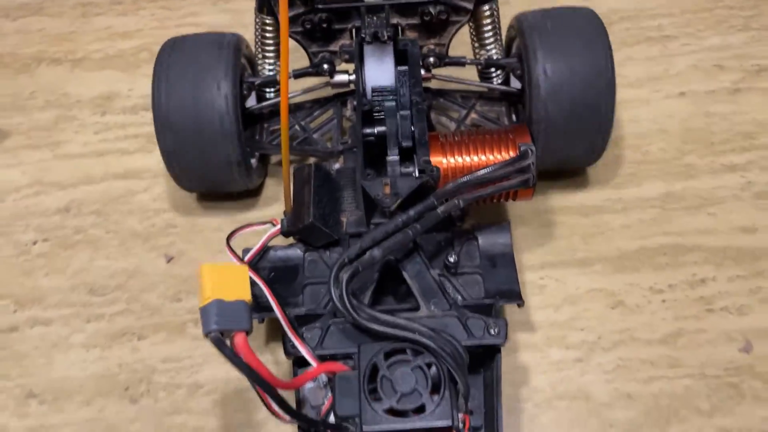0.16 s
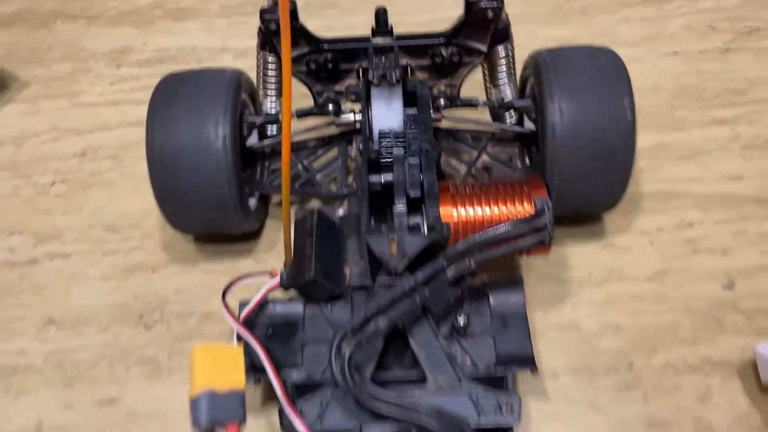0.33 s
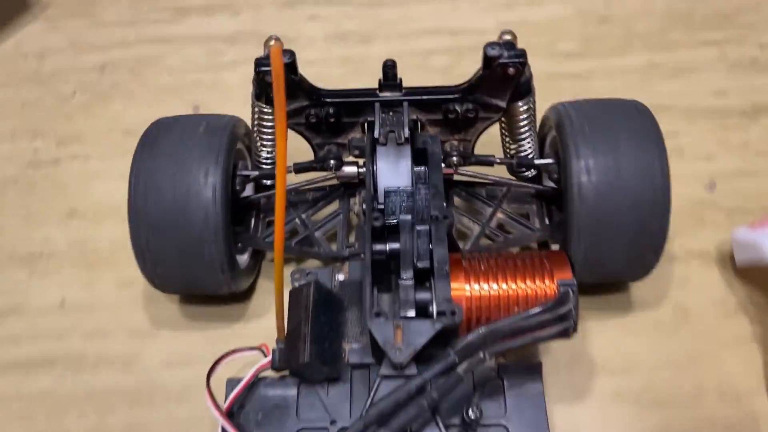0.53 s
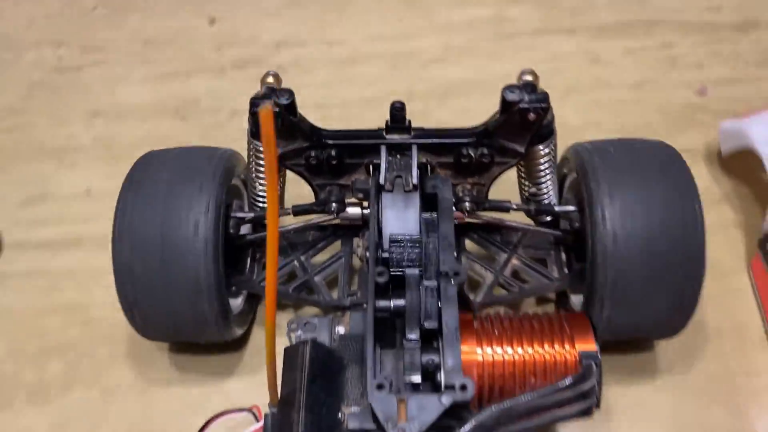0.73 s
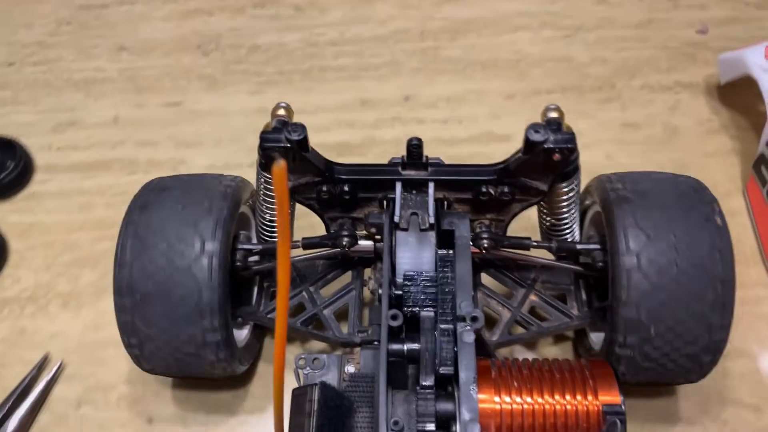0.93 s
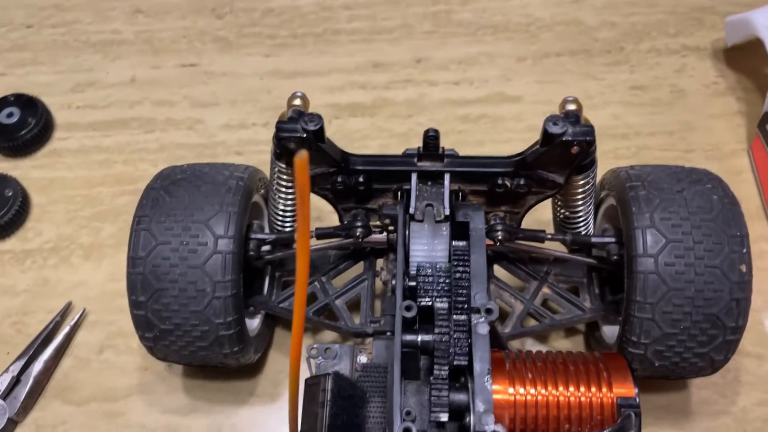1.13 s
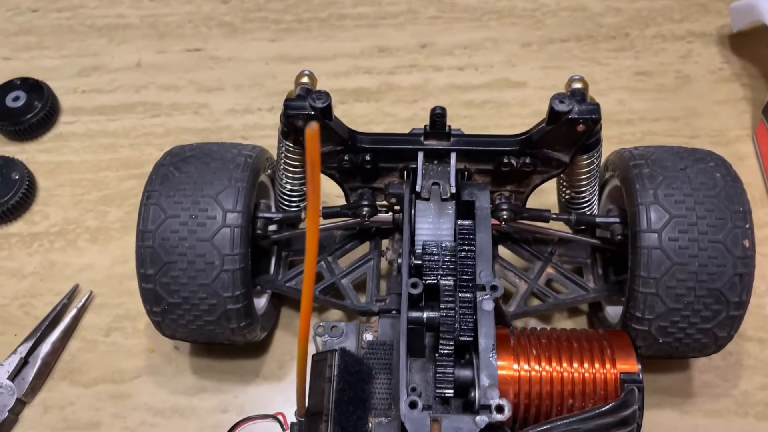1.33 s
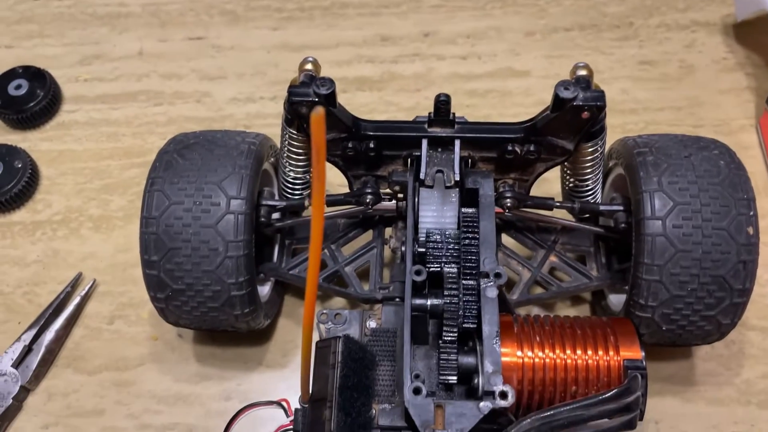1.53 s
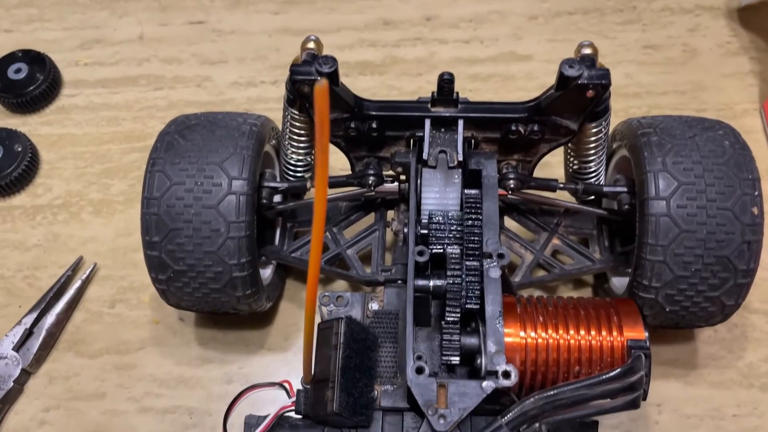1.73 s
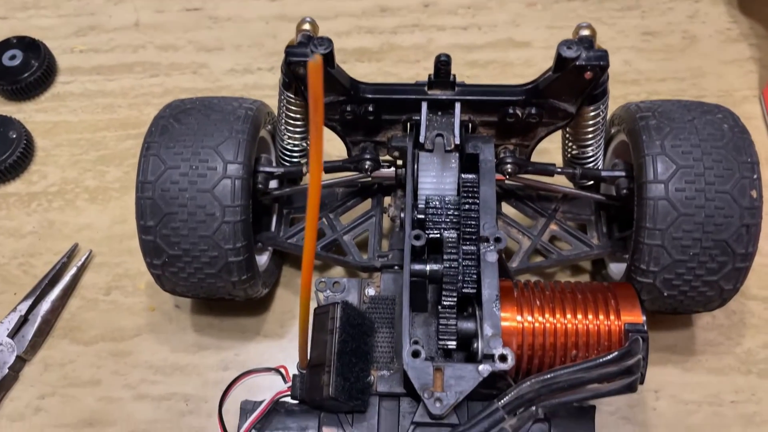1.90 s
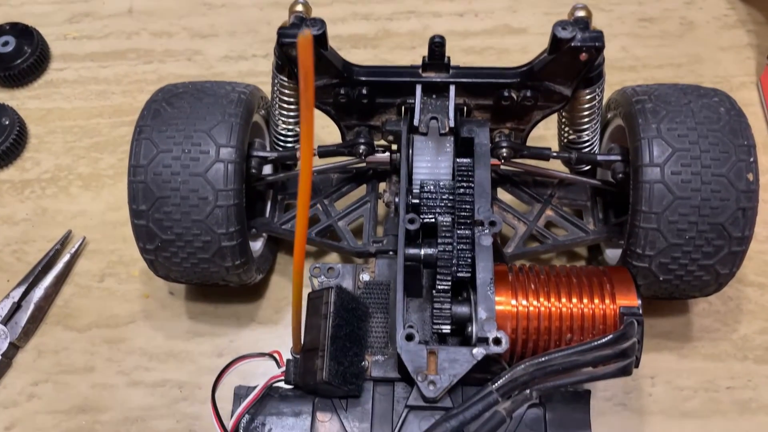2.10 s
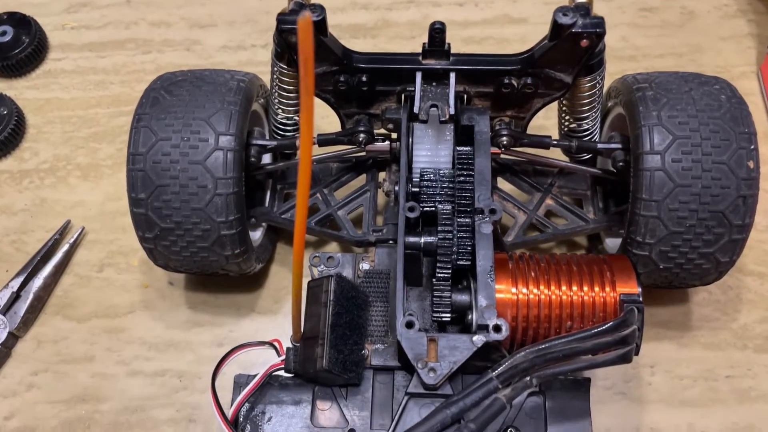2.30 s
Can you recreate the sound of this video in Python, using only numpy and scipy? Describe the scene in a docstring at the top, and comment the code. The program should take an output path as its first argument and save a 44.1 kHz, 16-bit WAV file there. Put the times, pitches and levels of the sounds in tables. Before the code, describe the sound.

Small plastic gears whir and chatter unevenly in one short spin, heard up close indoors, as the workbench rumbles softly beneath. They slow and stop with a few sharp clacks, leaving faint clicks and a low hum.

```python
"""Plastic gearbox on a wooden bench

A model car's open gearbox spins up, rattles as it coasts and clacks to a stop. Each impact of tooth
on tooth excites short, damped resonances of housing and gears, and the mesh whirrs between them.
The bench rumbles with the spin; a low hum and room air lie under it. A faint rub and ticks follow."""
import sys
import numpy as np
from scipy import signal
from scipy.fft import rfft, irfft
from scipy.io import wavfile
from scipy.ndimage import uniform_filter1d

SR = 44100
rng = np.random.default_rng(int(sys.argv[2]) if len(sys.argv) > 2 else 0)


def store_pcm(level_fs):
    """Save levels as 16-bit WAV."""
    pcm = np.round(np.clip(level_fs, -1, 1) * 32767).astype(np.int16)
    wavfile.write(sys.argv[1], SR, np.atleast_2d(pcm).T)


N = 103635
BAND_LIMIT_HZ = 16600
# Strength of the gear mesh over the spin: (time [s], relative level [dB])
MESH_LEVEL = [(.05, -77), (.11, -67.5), (.16, -48.5), (.2, -55.5), (.29, -42.5), (.33, -46.5), (.37, -42),
              (.47, -41), (.56, -38.5), (.62, -44), (.69, -39.5), (.74, -46), (.78, -40.5), (.82, -48),
              (.85, -39), (.9, -46.5), (1.02, -53.5), (1.09, -47.5), (1.15, -56), (1.2, -69.5),
              (1.29, -85.5)]


def impacts(rows):
    """Impact excitation: each blow sets off damped modes of housing and gears, and a treble burst."""
    # Housing modes beside the main one: (frequency ratio [1], relative level [dB])
    housing_modes = [(.55, -17), (1.45, -16)]
    # Gear modes, alike in pitch for every blow: (frequency [Hz], relative level [dB])
    gear_modes = [(2350, -2), (3100, -3), (4050, -3), (4750, 1), (5450, -7), (6150, -6)]
    # Spectrum of the treble burst: (frequency [Hz], gain [dB])
    treble_spectrum = [(1900, -29), (2600, -4.5), (6000, -17.5), (7200, -18.5), (11000, -43),
                       (14000, -70.5)]
    # A faint, very high fizz (8-16 kHz), heard mainly on the early ticks: (frequency [Hz], gain [dB])
    fizz_spectrum = [(6500, -41.5), (8000, -8), (13000, -22.5), (15200, -5.5), (16400, -13)]
    housing_band_hz = [650, 2670]  # the small open housing radiates little below this band
    peak_s, level_db, ring_hz, length_ms, treble_db, fizz_db = np.transpose(rows)[:, :, None]
    offsets = np.arange(1024) - 256
    t = offsets / SR
    draw = rng.standard_normal((len(rows), 24 + 2 * 1024))
    phase, strike_db = 3 * draw[:, :24, None], 2 * draw[:, 4:14, None]
    treble_noise, fizz_noise = draw[:, 24:1048], draw[:, 1048:]

    def envelope(stretch, rise):
        """Gaussian onset, rounding into exponential decay."""
        age = t / (stretch * length_ms / 1000)
        return np.where(age < 0, np.exp(-(age / rise) ** 2), np.exp(.5 - np.hypot(age / .41, .5)))

    def place(pulses):
        """Superposition of the pulses, each at its time and level."""
        samples = np.round(peak_s * SR).astype(int) + offsets
        return np.bincount(samples.ravel(), (amp(level_db) * pulses).ravel(), N + 1024)[:N]

    housing = np.sin(2 * np.pi * ring_hz * t + phase[:, 0])
    for k, (ratio, mode_db) in enumerate(housing_modes):
        housing += amp(mode_db) * np.sin(2 * np.pi * ring_hz * ratio * t + phase[:, 1 + k])
    gears = sum(amp(mode_db + strike_db[:, k]) * np.sin(2 * np.pi * hz * t + phase[:, 14 + k])
                for k, (hz, mode_db) in enumerate(gear_modes))
    housing = place(housing * envelope(stretch=.88, rise=.56))
    gears = place(amp(treble_db - 3) * gears * envelope(stretch=1.2, rise=.5))
    treble = place(amp(treble_db + 12.5) * treble_noise * envelope(stretch=1.2, rise=1))
    fizz = place(amp(fizz_db + 8.5) * fizz_noise * envelope(stretch=1.8, rise=1))
    radiation = signal.butter(4, housing_band_hz, "band", fs=SR, output="sos")
    return (signal.sosfiltfilt(radiation, housing) + gears
            + colour(treble, treble_spectrum) + colour(fizz, fizz_spectrum))


def rattle():
    """Irregular impacts: loud knocks of tooth on tooth, with faint ticks before and after."""
    # Blows: (time [s], level [dB], ring frequency [Hz], time scale [ms], relative treble level [dB],
    # relative level of the faint, very high fizz [dB])
    blows = [(0.0291, -51, 2040, 2.6, -19.5, -37), (0.0455, -57, 2060, 2.3, -22, -13.5),
             (0.0489, -57.5, 1720, 2.8, -5, -21), (0.1004, -57, 2030, 1.5, -38, -42.0),
             (0.1119, -57.5, 1770.0, 0.79, -6, 1), (0.1249, -49.5, 1720.0, 1.3, -13.5, -10.5),
             (0.1375, -37.5, 1610, 1.1, -32.5, -48), (0.1428, -28.5, 1700, 0.66, -20, -25.5),
             (0.15, -45.5, 1620.0, 0.91, -30, -43), (0.1543, -49.5, 1670, 1.5, -18.5, -28.5),
             (0.1691, -34, 1700, 1.33, -13.5, -26.5), (0.2062, -35.5, 1910.0, 1.2, -22, -13),
             (0.2193, -26, 1650, 1.1, -21.5, -25.5), (0.244, -35, 1620.0, 1.2, -36.5, -47.5),
             (0.2477, -37, 1630.0, 0.5, -11, -29), (0.2508, -36, 1600.0, 1.0, -12, -15.5),
             (0.2689, -32, 1540.0, 0.6, -32.5, -72), (0.2741, -28.5, 1440.0, 1.43, -34.5, -63),
             (0.2907, -27.5, 1730, 0.61, -15.5, -56.5), (0.2956, -26, 1865, 1.3, -23.5, -46),
             (0.3102, -32.5, 1545, 0.8, -41, -49), (0.3593, -31, 2000.0, 1.9, -21, -44.5),
             (0.3639, -27.5, 1550.0, 1.7, -23.5, -52), (0.3725, -27.5, 1720, 1.8, -27.5, -50.5),
             (0.377, -23.5, 1650, 0.62, -22.5, -49), (0.3875, -26.5, 1495, 2.5, -34, -46.5),
             (0.4045, -29.5, 1600.0, 2.6, -23.5, -30), (0.4326, -23, 1690, 1.25, -20, -36.5),
             (0.4444, -21.5, 1420.0, 2.2, -19.5, -32), (0.4495, -21.5, 1730.0, 0.39, -22, -34),
             (0.4622, -23, 1530.0, 2.5, -35.5, -41), (0.481, -21, 1750, 0.75, -26.5, -26.5),
             (0.5476, -26, 1640.0, 1.5, -34, -51), (0.5559, -33.5, 1560, 1, -20, -51.5),
             (0.5602, -28.5, 1690.0, 0.82, -23, -49), (0.6192, -29.5, 1520.0, 1.4, -30.5, -43),
             (0.6916, -22, 1560, 1.5, -29, -42.5), (0.6969, -25, 1560.0, 1.35, -21, -45.5),
             (0.7123, -18.5, 1480, 1.42, -21, -33), (0.7475, -33, 1660, 1.9, -25, -45.5),
             (0.8026, -30, 1675, 1, -26, -48), (0.8053, -36, 1453, 0.85, -29.5, -53),
             (0.8426, -25.5, 1633, 1.1, -29, -52.5), (0.8489, -27.5, 1467, 1.11, -23.5, -51),
             (0.8546, -31.5, 1620.0, 1.1, -29, -51), (0.8599, -25, 1493, 0.92, -19, -55.5),
             (0.9174, -32, 1640.0, 1.3, -19.5, -43.5), (0.9302, -22, 1461, 1.0, -22.5, -53.5),
             (0.9512, -34, 1590.0, 1, -21.5, -42), (0.9574, -29, 1570.0, 1.2, -27.0, -49.5),
             (0.9867, -34, 1570.0, 1.8, -30.5, -44), (0.99, -28.5, 1692, 1.4, -24, -37),
             (0.9932, -28.5, 1468, 1.2, -22, -44), (1.0392, -27, 1707, 1.27, -17.5, -48.5),
             (1.0527, -39, 1617, 0.55, -13, -41.5), (1.0585, -39, 1600.0, 0.75, -7.5, -20),
             (1.0617, -29.5, 1610.0, 0.44, -21, -34), (1.0644, -30, 1810.0, 1.7, -24.5, -32),
             (1.0686, -26, 1304, 2, -19, -37.5), (1.0711, -16.5, 1630.0, 1.5, -16.5, -36.5),
             (1.0863, -34.5, 1720.0, 0.9, -22, -42.5), (1.0922, -35.5, 1698, 1, -24, -38.5),
             (1.0968, -21, 1305, 1.43, -14.5, -41), (1.098, -22, 2293, 2.04, -24.5, -43.5),
             (1.0988, -20.5, 1290.0, 1.4, -20, -43.5), (1.1263, -38, 1595, 0.64, -23.5, -47),
             (1.1345, -25, 1460, 1.9, -23, -35.5), (1.1373, -26.5, 1367, 0.8, -16, -38.5),
             (1.142, -15.5, 1569, 1.3, -15.5, -45), (1.1428, -27, 950.0, 0.77, -29.5, -45),
             (1.1481, -35, 1620.0, 1.0, -18.5, -41.5), (1.3208, -42, 1690.0, 1.66, -15.5, -13),
             (1.7527, -87, 1396, 2.4, 4.5, -12), (1.8312, -58.5, 1400, 1, -14, -8.5),
             (1.8866, -70, 1920, 1.8, -8, -23.5)]
    return impacts(blows)


def tooth_train():
    """Gear meshing: one small, uneven impact per passing tooth, so their rate follows the speed."""
    # Tooth-passing rate: (time [s], rate [teeth/s])
    mesh_rate = [(.05, 151), (.3, 217), (.55, 260), (.78, 204), (.95, 150), (1.3, 88)]
    count, first_tooth, jitter_teeth = 400, 20, .12
    timing, force, pitch, treble, fizz, length = np.clip(rng.standard_normal((count, 6)), -2, 2).T
    teeth_passed = np.cumsum(curve(mesh_rate)) / SR
    tooth = first_tooth + np.arange(count) + jitter_teeth * timing
    peak_s = np.interp(tooth, teeth_passed, np.arange(N) / SR)
    level_db = np.interp(peak_s, *np.transpose(MESH_LEVEL), right=-140) + 2.5 + 2.5 * force
    ring_hz, length_ms = 1594 * np.exp(.042 * pitch), .9 * np.exp(.3 * length)
    treble_db, fizz_db = -25 + 1.3 * treble, -68 + 3.5 * fizz
    rows = np.transpose([np.minimum(peak_s, 2), level_db, ring_hz, length_ms, treble_db, fizz_db])
    return impacts(rows)


def whirr():
    """Amplitude-modulated noise: the mesh whirrs and flutters for as long as the gears spin."""
    # Spectrum of the mesh noise: (frequency [Hz], gain [dB])
    spectrum = [(300, -29.5), (640, -16), (740, -4), (1600, 0), (2150, -7), (2600, -19), (6050, -25),
                (6900, -33), (12600, -63), (15300, -41), (16400, -48.5)]
    t = np.arange(N) / SR
    spinning = (t > MESH_LEVEL[0][0]) & (t < MESH_LEVEL[-1][0])
    mesh_noise = noise(spectrum)
    flutter_db = 4 * drift(250)
    return mesh_noise * amp(curve(MESH_LEVEL) - 4.5 + flutter_db) * spinning


def rub():
    """Friction noise: one faint rub after the stop."""
    # Envelope of the rub: (time [s], level [dB])
    level = [(1.38, -108), (1.43, -86.5), (1.5, -86.5), (1.6, -106)]
    # Spectrum of the rub: (frequency [Hz], gain [dB])
    spectrum = [(1500, -17.5), (1950, 0), (2500, -4), (3200, -20.5), (5250, -3.5), (6200, -18.5)]
    return noise(spectrum) * amp(curve(level))


def bench_rumble():
    """Forced vibration: the bench rumbles with the spin, its own note wandering within the noise."""
    # Envelope of the rumble: (time [s], level [dB])
    level = [(0, -60), (.18, -60), (.23, -49), (.3, -55), (.39, -45.5), (.79, -47.5), (.83, -53),
             (1.02, -49), (1.25, -65), (1.4, -62), (1.47, -71), (1.59, -59), (1.9, -71.5), (2.1, -63.5),
             (2.35, -63.5)]
    # Spectrum of the rumble: (frequency [Hz], gain [dB])
    spectrum = [(25, -30), (45, -5.5), (70, -1), (100, -6.5), (155, -9), (190, -21), (390, -33)]
    note_hz = 55.74 * (1 + .024 * drift(10))
    note = np.sin(2 * np.pi * np.cumsum(note_hz) / SR)
    rumble = unit_rms(noise(spectrum) + amp(2.5) * note)
    return rumble * amp(uniform_filter1d(curve(level), size=1500))


def reflections(direct):
    """Reverberation: quick reflections from the bench, then the room's longer, coloured tail."""
    # Colour of the room's tail: (frequency [Hz], gain [dB])
    room_spectrum = [(100, -0.5), (900, 2.5), (1600, -10), (2900, 5), (4400, -2), (17000, -4)]
    bench = signal.fftconvolve(direct, tail(t60=.037, size=3000))[:N]
    room = signal.fftconvolve(colour(direct, room_spectrum), tail(t60=.25, size=SR // 2))[:N]
    return amp(-11.5) * bench + amp(-15.5) * room


def spread(direct):
    """Phase difference: sound arrives left and right slightly apart, giving a side in quadrature."""
    # Side signal relative to the mid: (frequency [Hz], gain [dB])
    side_spectrum = [(200, -15), (380, -4), (700, -10), (1290, -30.5), (2380, -13), (4400, -11), (8120, 5),
                     (15000, 7.5)]
    side_reflections_db, left_over_right_db = 9, 1.1
    mid = direct + reflections(direct)
    side = -signal.hilbert(direct).imag + amp(side_reflections_db) * reflections(direct)
    side = colour(side, side_spectrum + [(BAND_LIMIT_HZ, 4.0)])
    return np.array([mid + side, mid - side]) * amp([[left_over_right_db / 2], [-left_over_right_db / 2]])


def hum():
    """Slow random modulation: a low tone wavers in phase and level."""
    hum_hz, t = 117.6, np.arange(N) / SR
    phase_rad = .45 * drift(11)
    level_db = -62 + 2.8 * drift(4.5)
    return np.sin(2 * np.pi * hum_hz * t + phase_rad) * amp(level_db)


def room_air():
    """Ambient noise: uncorrelated mid and side signals make the faint room air wide."""
    # Spectrum of the air's mid signal: (frequency [Hz], gain [dB])
    mid_spectrum = [(82, -17.5), (140, -0.5), (351, -17), (403, -17), (482, -21.5), (589, -19.5),
                    (932, -31), (1480, -29), (16500, -49.5)]
    # Spectrum of the air's side signal: (frequency [Hz], gain [dB])
    side_spectrum = [(30, -5.5), (230, -6), (1400, -20.5), (9400, -36), (16500, -40)]
    mid, side = amp(-74.5) * noise(mid_spectrum), amp(-78) * noise(side_spectrum)
    return np.array([mid + side, mid - side])


def amp(db):
    """Decibels as an amplitude ratio."""
    return 10 ** (np.asarray(db) / 20)


def unit_rms(x):
    """Normalisation to a mean power of 1."""
    return x / np.sqrt(np.mean(x ** 2) + 1e-20)


def curve(points):
    """Linear interpolation of (time [s], value) at every sample."""
    return np.interp(np.arange(N) / SR, *np.transpose(points))


def colour(x, spectrum):
    """Spectral shaping by (frequency [Hz], gain [dB]), with a gain of -90 dB outside the table."""
    hz, db = np.transpose(spectrum)
    bin_hz = np.fft.rfftfreq(x.shape[-1], 1 / SR)
    gain_db = np.interp(np.log(bin_hz + 1), np.log(hz + 1), db, -90, -90)
    return irfft(rfft(x) * amp(gain_db), x.shape[-1])


def noise(spectrum):
    """Filtered Gaussian noise, rms 1."""
    return unit_rms(colour(rng.standard_normal(N), spectrum))


def drift(hz):
    """Random fluctuation from 0.4 Hz up to hz, rms 1."""
    return noise([(.4, 0), (hz, 0)])


def tail(t60, size):
    """Impulse response of dense reflections decaying by 60 dB in t60 seconds, energy 1."""
    taps = rng.standard_normal(size) * amp(-60 * np.arange(size) / SR / t60)
    taps[:40] = 0  # reflections arrive after the direct sound
    return taps / np.linalg.norm(taps)


def scene():
    """Superposition of gearbox, bench, hum and air, as left and right."""
    gearbox = rattle() + tooth_train() + whirr() + rub()
    return spread(gearbox) + bench_rumble() + hum() + room_air()


def record(dry):
    """Band limiting by a linear-phase low-pass filter."""
    lowpass = signal.firwin(511, BAND_LIMIT_HZ, window=("kaiser", 9), fs=SR)
    return signal.oaconvolve(dry, lowpass[None], "same")


dry = scene()
out = record(dry)
store_pcm(out)
```